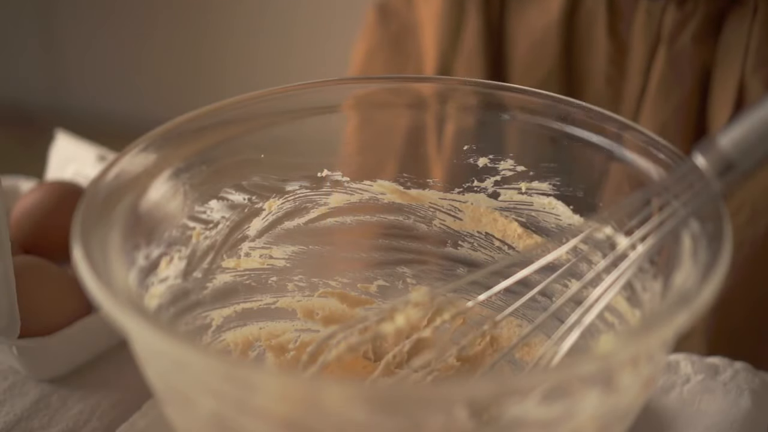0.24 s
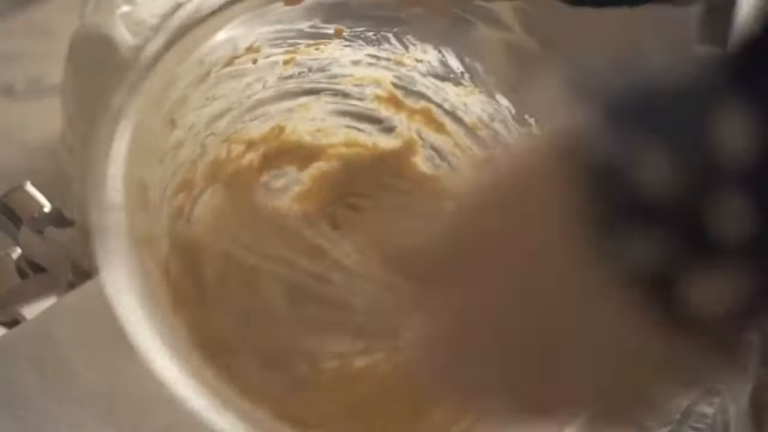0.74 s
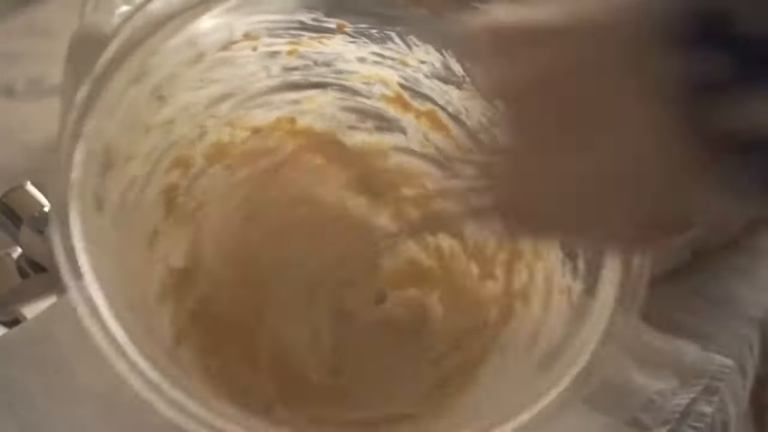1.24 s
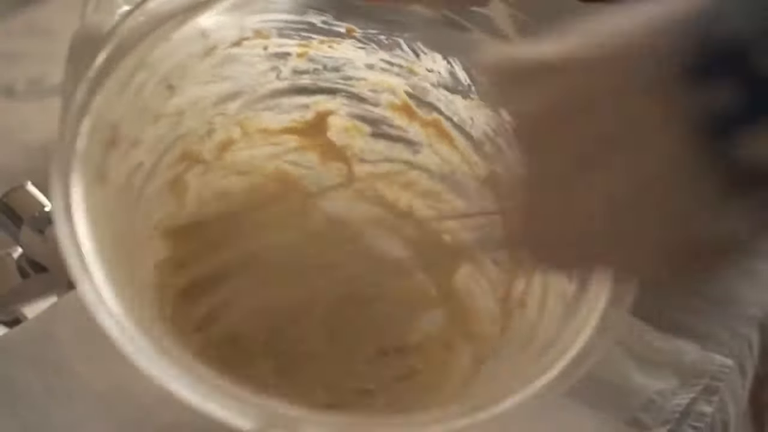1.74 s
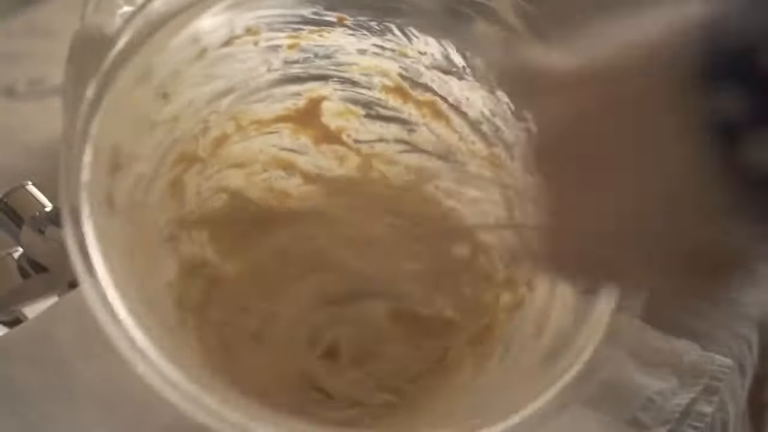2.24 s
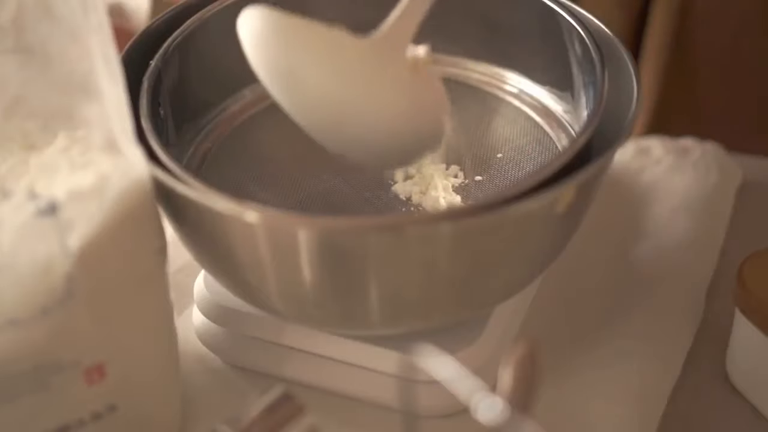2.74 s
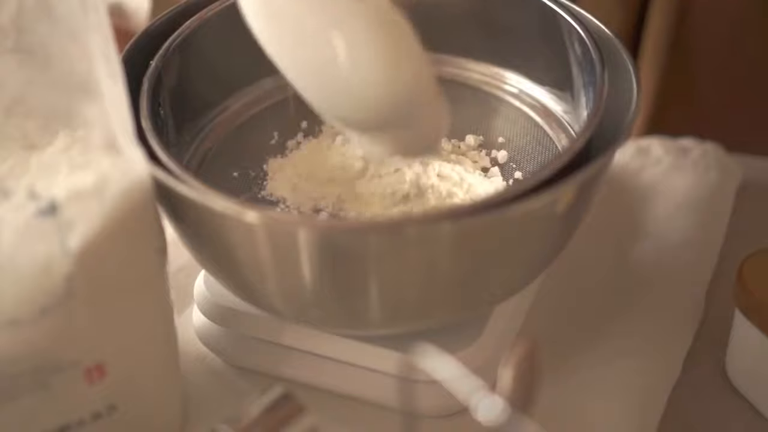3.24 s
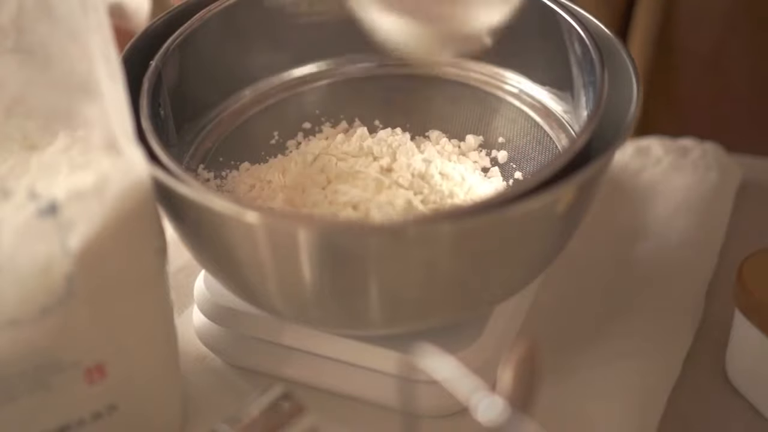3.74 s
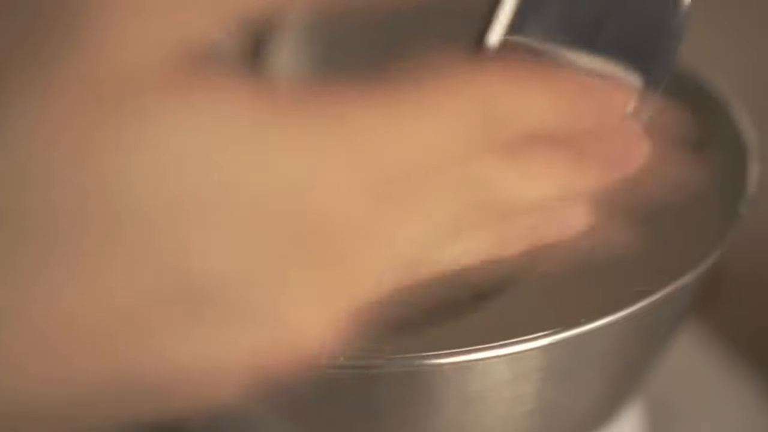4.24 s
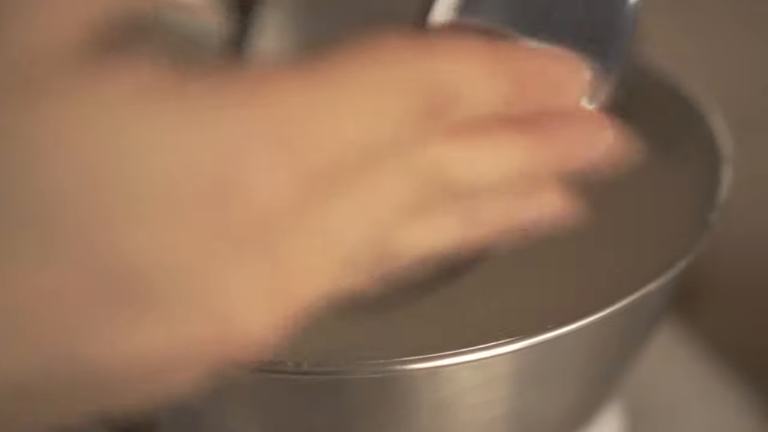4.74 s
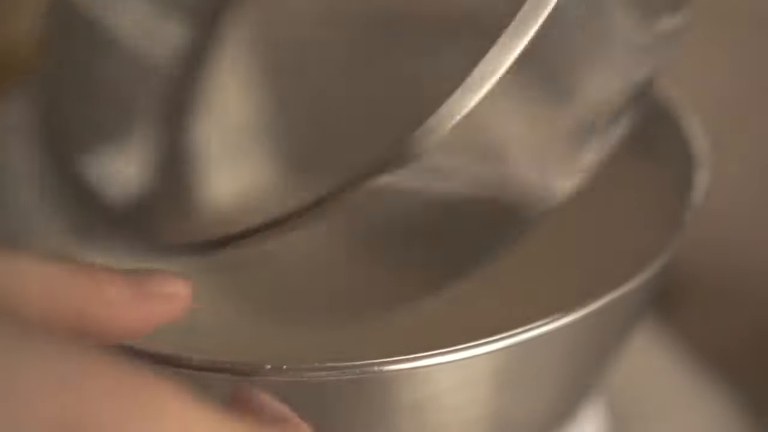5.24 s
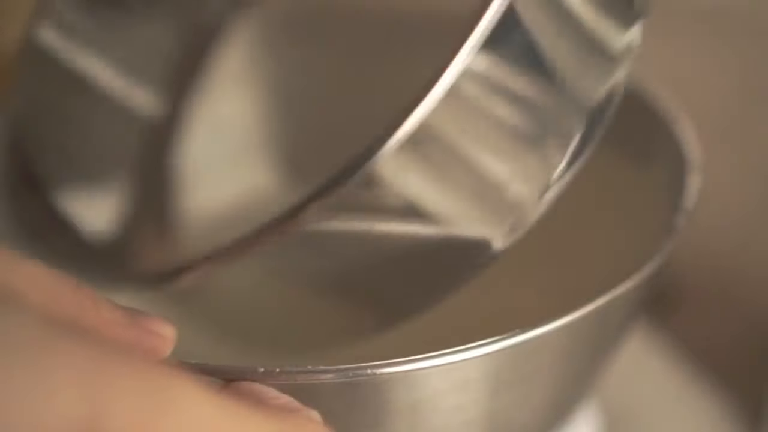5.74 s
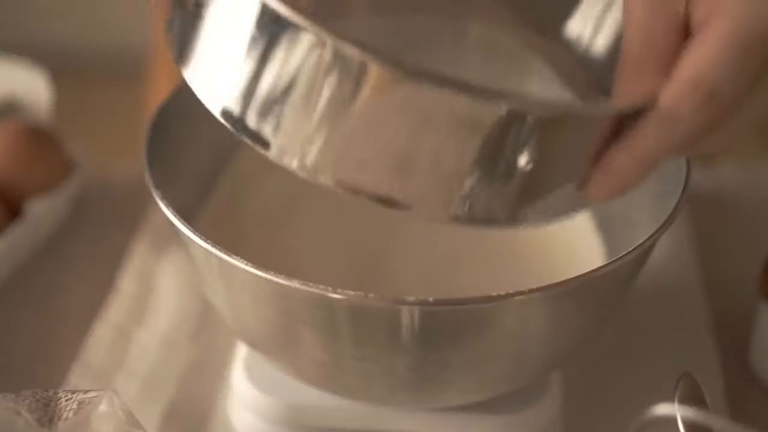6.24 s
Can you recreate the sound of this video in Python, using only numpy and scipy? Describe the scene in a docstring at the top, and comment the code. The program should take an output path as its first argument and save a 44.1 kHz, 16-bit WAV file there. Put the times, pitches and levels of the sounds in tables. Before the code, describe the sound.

In a small quiet kitchen, closely miked, a wire whisk clatters against a glass bowl about ten times a second, with sticky butter squelches and popping air pockets. It stops; flour lumps tick faintly onto mesh. A palm pats the sieve five times with dull thumps, soft shakes follow, and finally the rim clanks sharply against a steel bowl in quick knocks.

```python
"""A wire whisk beats soft butter in a glass bowl: noise grains coloured by glass and butter, with ringing
wire modes, torn hollows and bursting air pockets. Then flour is spooned into a steel sieve as ticking grains.
A palm pats the sieve five times (sine thump, noise slap), setting its mesh wobbling; soft shakes hiss flour.
Last, the rim is knocked four times against a steel bowl: noise cracks and ringing modes, with short slides.
All this in a small quiet kitchen: short noise reflections, steady air noise and a low hum."""
import sys
import numpy as np
from scipy import signal
from scipy.fft import rfft, irfft
from scipy.io import wavfile
from scipy.ndimage import uniform_filter1d

SR = 44100
rng = np.random.default_rng(int(sys.argv[2]) if len(sys.argv) > 2 else 0)


def store_pcm(level_fs):
    """Save levels as 16-bit WAV."""
    pcm = np.round(np.clip(level_fs, -1, 1) * 32767).astype(np.int16)
    wavfile.write(sys.argv[1], SR, np.atleast_2d(pcm).T)


N = 285768
T = np.arange(N) / SR
AGE = T[:SR // 2]   # time since an event, s

# Steady room air. Each row: frequency in Hz, relative density in dB per Hz.
ROOM_COLOUR = [(12, -36), (20, -2), (75, -6.5), (97, -3), (124, 1.5), (157, -8.5), (199, -4), (295, -14),
               (365, -10.5), (416, -15.5), (652, -15.5), (806, -17.5), (2260, -22.5), (4480, -26),
               (11000, -29), (14300, -104)]
# Hum tones. Each row: frequency in Hz, level in dB rms.
HUM_TONES = [(76, -64), (124, -66), (366, -75.5)]
ROOM_AIR_DB = -55
# Stereo width of near sounds. Each row: frequency in Hz, side level in dB re mid.
NEAR_SIDE = [(100, -14), (700, -26), (2000, -19), (4500, -9.5), (11000, -8)]
# Stereo width of diffuse air. Each row: frequency in Hz, side level in dB re mid.
AIR_SIDE = [(100, -12), (200, -6.5), (1100, -3), (4000, -1), (11000, 0)]
KITCHEN_T60_S, KITCHEN_DB = 0.22, -11
CUTOFF_HZ = 11050

# Whisk meets glass. Each row: start in seconds, level in dB, bass shelf in dB, treble shelf in dB,
# contact time in seconds, pitch of the hollow in the butter in Hz, squelch after it in dB before the mix gains.
WHISK_HITS = [(.308, -28, 0, 4, 0.012, 1760, -32), (.367, -28.5, -6, -5, 0.0081, 2110, -33.5),
              (0.413, -33, -2, 6, 0.0039, 3430, -45), (.519, -37.5, 11, 8, 0.012, 2410, -33.5),
              (.586, -25, 5, -1, 0.016, 2260, -38), (.688, -25.5, 2, -0.5, 0.015, 1910, -34),
              (.792, -35.5, 4, -5, 0.014, 3990, -56), (.807, -25.5, -0.5, -5.5, 0.0033, 2400, -58),
              (.914, -31, 2, 1, 0.017, 3000, -41), (1.008, -29, 1, -9, 0.006, 1500, -37.5),
              (1.125, -35, -3, -2, 0.0053, 1450, -55), (1.138, -32.5, 2.5, 2, 0.0062, 1450, -36.5),
              (1.243, -26.5, -4, -5, 0.0036, 1460, -37.5), (1.353, -39.5, 7, 5.5, 0.034, 1760, -43),
              (1.471, -23, 4, -4, 0.0068, 2520, -34), (1.577, -31, -0.5, 9, 0.0082, 1690, -62),
              (1.611, -32, 6.5, 6, 0.0038, 3360, -52), (1.715, -26, 6, 0.5, 0.0081, 1480, -42),
              (1.838, -29.5, -2.5, 2.5, 0.017, 1220, -42.5), (1.972, -33, -2, -6, 0.024, 1850, -41),
              (2.0745, -31, 2.5, 5.5, 0.006, 2930, -38), (2.196, -25.5, 0.5, -7, 0.0049, 1570, -34.5),
              (2.308, -36, 5.5, 4, 0.0029, 1460, -57), (2.324, -28.5, -1, 7, 0.0066, 1820, -43.5),
              (2.423, -40, 0, -0.5, 0.0074, 3160, -64)]
# Wires spring clear of the butter and twang. Each row: start in seconds, level in dB,
# boost above 4.5 kHz in dB, share of the free ring time.
TWANGS = [(.308, -36, 16, 0.32), (1.245, -47.5, 18, 0.25), (1.579, -44, 12, 1), (1.611, -42, 8, 0.53),
          (1.853, -39, 9.5, 0.64), (1.975, -48, -7, 0.66), (2.087, -39, 2, 0.68), (2.324, -34, 0, 0.45)]
# Wire loops. Each row: frequency in Hz, relative level in dB, free t60 in seconds.
WIRE_MODES = [(660, -7.5, 0.24), (1777, 4.5, 0.37), (3284, -4, 0.2), (3360, -6, 0.09), (5160, -7, 0.08),
              (7315, -7, 0.15), (7450, -11, 0.12)]
# Colour of the struck glass. Each row: frequency in Hz, relative density in dB per Hz.
GLASS_COLOUR = [(150, -18.5), (270, -16.5), (510, 1.5), (720, -3.5), (1200, -9), (1420, -1), (1630, -5),
                (1900, -5), (4830, -9), (5750, -12.5), (6840, -15), (7400, -8.5), (8010, -14), (10500, -13),
                (13000, -49)]
# Glass bowl damped by the butter. Each row: frequency in Hz, width in Hz, boost in dB.
BOWL_PEAKS = [(550, 84, -3.5), (652, 87, 6), (1040, 280, -2)]
TRAILING_GAP_S, TRAILING_LOSS_DB = 0.014, 7   # gap before random scaling; loss per further wire

# Uneven drag through the butter. Each row: time in seconds, level in dB before DRAG_DB and the mix gains.
DRAG_COURSE = [(0.4, -51), (0.475, -27.5), (0.564, -42), (0.852, -43), (1.442, -33.5), (1.756, -41),
               (2.174, -36.5), (2.274, -48), (2.38, -70)]
# Colour of butter sounds. Each row: frequency in Hz, relative density in dB per Hz.
BUTTER_COLOUR = [(120, -38), (230, -18), (404, -0.5), (692, 0.5), (1150, -10), (1420, -1.5), (2500, -4),
                 (3830, -6.5), (5530, -12.5), (7360, -9), (9000, -13), (10300, -12), (13000, -42)]
SQUELCH_RISE_S, SQUELCH_FALL_DB_PER_S = 0.032, 186
WHISK_START_S, WHISK_END_S = .31, 2.44
TEARING_DB, TICKS_DB, DRAG_DB = -5, -13.5, -6
HOLLOW_LOW_HZ, HOLLOW_HIGH_HZ, HOLLOW_Q = 554, 5350, 7.7

# Table shudders under the bowl. Each row: time in seconds, level in dB before SHUDDER_GAIN_DB.
SHUDDER_COURSE = [(0.31, -53), (0.37, -37), (0.46, -46.5), (0.65, -55), (0.77, -43), (0.91, -52.5),
                  (0.96, -49), (1.08, -54), (1.59, -49.5), (1.63, -47), (2.05, -50), (2.27, -48),
                  (2.43, -65)]
# Colour of the table. Each row: frequency in Hz, relative density in dB per Hz.
TABLE_COLOUR = [(20, -22), (40, -7.5), (54, 2.5), (75, -11), (115, -5.5), (170, -20.5), (300, -23.5),
                (600, -54)]
SHUDDER_GAIN_DB = -2.5

# Placed air-pocket bursts. Each row: start in seconds, level in dB before POCKET_GAIN_DB, pitch in Hz.
AIR_POCKETS = [(0.8336, -24, 2230), (1.5312, -19, 3270), (1.5492, -26, 2210), (1.5635, -26, 1770),
               (1.7868, -38, 1600), (1.811, -36, 1940), (1.0855, -29.5, 2500)]
POCKET_GAIN_DB, SMALL_POCKET_MIN_DB = 2, -40   # the minimum is before the gain
POCKET_CYCLES = 13.4   # cycles to fall 60 dB

# Single wires scrape the butter. Each row: start in seconds, level in dB, ringing pitch in Hz.
SCRAPES = [(.387, -32.5, 2100), (0.399, -41, 7400), (.452, -35, 2240), (.476, -37, 9000),
           (0.716, -48, 2500), (.739, -36, 2500), (0.894, -40.5, 1710), (1.021, -30.5, 1670),
           (1.052, -42, 3450), (1.157, -40.5, 686), (1.186, -35, 695), (1.28, -36, 3360),
           (1.308, -31.5, 3310), (1.336, -36.5, 2210), (1.392, -39, 3350), (1.435, -38.5, 3040),
           (1.745, -30, 2560), (1.954, -36.5, 2160), (2.009, -39, 1810), (2.14, -39, 694),
           (2.226, -39, 3750)]
SCRAPE_S, SCRAPE_PEAK_DB, SCRAPE_WIDTH_SHARE = 0.0025, 11, 0.67

# Lumps of flour drop from the spoon on the mesh. Each row: start in seconds, level in dB.
FLOUR_LUMPS = [(2.604, -52.5), (2.624, -53.5), (2.729, -54.5), (2.872, -55), (2.897, -60), (2.965, -55),
               (3.266, -58.5), (3.317, -54), (3.347, -55), (3.372, -57), (3.389, -59.5)]
# Colour of flour on mesh. Each row: frequency in Hz, relative density in dB per Hz.
FLOUR_COLOUR = [(600, -19), (1300, -8), (1650, -10), (2100, -2), (2330, -6), (2550, 3), (2900, -9),
                (3600, -6), (4400, -18), (11000, -25)]
BRUSH_S = 0.0039

# Resonances of the creak. Each row: frequency in Hz, relative level in dB, t60 in seconds.
CREAK_MODES = [(468, -6.5, 0.23), (920, -5, 0.14), (1102, -8, 0.2), (1430, 1, 0.046), (1690, 4, 0.03)]
CREAK_PEAK_S, CREAK_DB, CREAK_RISE_S, CREAK_FALL_DB_PER_S = 3.8, -59, 0.05, 60

# Palm pats the sieve. Each row: start in seconds, thump in dB, lag of the slap in seconds, slap in dB,
# treble shelf in dB, wobble after it in dB.
PATS = [(4.076, -23, -0.00088, -30, -2.5, -37.5), (4.2215, -34, -0.0042, -31, 3, -48),
        (4.3649, -29, 0.0026, -35, 4.5, -45), (4.522, -26.5, -.0004, -31, -3.5, -48.5),
        (4.6618, -27, 0.00062, -33.5, -5.5, -47)]
# Colour of the palm slap. Each row: frequency in Hz, relative density in dB per Hz.
PALM_COLOUR = [(70, -10), (370, -16), (600, -8), (1080, -21.5), (1380, -7.5), (1580, -6.5), (1850, -17.5),
               (2100, -10.5), (2500, -16), (3100, -9.5), (4300, -17), (11000, -16)]
THUMP_HZ, THUMP_RISE_S, SLAP_S = 328, 0.0014, 0.0042

# Flutter of the mesh. Each row: frequency in Hz, relative density in dB per Hz.
WOBBLE_COLOUR = [(35, -29), (60, -1), (75, 8.5), (92, -4), (130, 7.5), (180, -17), (280, -13.5), (450, -22),
                 (1000, -45)]
REBOUND_S, WOBBLE_RISE_S, WOBBLE_FALL_DB_PER_S = 0.07, 0.028, 102
MESH_HZ, MESH_SWAY_SHARE, MESH_DB, FLUTTER_DB = 108, 0.15, -4, -3   # centre pitch, its unsteadiness

# Soft shakes. Each row: start in seconds, wobble in dB, hiss of flour through the mesh in dB.
SHAKES = [(4.84, -46, -64.5), (4.99, -52, -63.5), (5.145, -43.5, -73), (5.33, -46, -63.5),
          (5.47, -52.5, -73), (5.63, -68, -66.5), (5.77, -57.5, -68)]
SIFT_LAG_S, SIFT_S = 0.025, 0.14

# Sieve rim knocks on the bowl. Each row: start in seconds, crack in dB, bass shelf in dB, treble shelf in dB,
# contact time in seconds, ring of the hoop in dB, ring of the bowl in dB, pitch of the struck spot in Hz.
CLANKS = [(6.0074, -36.5, -3, -3, 0.013, -39.5, -45.5, 3830),
          (6.106, -24.5, 16, 5.5, 0.007, -59, -47, 2150), (6.11, -18.5, 0, 6, 0.0011, -51, -35.5, 3620),
          (6.241, -26, 4.5, 1, 0.0057, -44, -48, 8200), (6.2529, -18, -17, -2, 0.0039, -35, -43, 3600),
          (6.3806, -24.5, 10.5, -1, 0.0047, -44, -48, 4600), (6.389, -25, -4, -10, 0.0035, -50, -49, 5600),
          (6.405, -20.5, -21, -1, 0.0037, -37.5, -41, 5880)]
# Colour of the crack. Each row: frequency in Hz, relative density in dB per Hz.
STEEL_COLOUR = [(120, -54), (200, -21), (605, -16.5), (1150, -13.5), (1450, -20), (1750, -6.5), (3020, -13),
                (3580, -1.5), (4200, -8), (5440, -6.5), (6330, -7.5), (6900, -2), (7330, -13), (7900, -7),
                (11000, -7), (14300, -40)]
# Modes of the sieve hoop. Each row: frequency in Hz, relative level in dB.
HOOP_MODES = [(1660, 3), (1718, -8), (3370, -3), (3700, -3), (3967, -6), (4855, -4), (5375, -3), (6045, -5)]
# Modes of the steel bowl. Each row: frequency in Hz, relative level in dB.
BOWL_MODES = [(1890, -1), (1992, -1), (2147, -3), (2263, -1), (2573, -6), (2873, -8), (3219, -6),
              (3469, -2), (3592, 1), (4530, -4), (5453, -5), (5976, -4), (6665, -3), (6842, -5), (7639, -7),
              (8290, -7)]
# Wash of weaker modes. Each row: frequency in Hz, relative density in dB per Hz.
WASH_COLOUR = [(200, -9.5), (1300, -20), (1650, 0), (2200, 0), (3000, -4.5), (3600, 0), (5000, -4),
               (6100, -4), (7350, -16), (7900, -9.5), (11000, -13.5)]
# Rim slides on the bowl. Each row: peak in seconds, level in dB before the mix gains, length in seconds.
SLIDES = [(6.336, -44.5, 0.014), (6.373, -49, 0.0064), (6.457, -49, 0.018)]
STEEL_T60_AT_2KHZ_S, WASH_SPACING_HZ = 0.125, 40
CHATTER_RAD, CHATTER_PER_S = .4, 80


def amp(db):
    """Decibels to gain."""
    return 10 ** (np.asarray(db) / 20)


def rms_one(x):
    """Scale to unit rms."""
    return x / np.sqrt(np.mean(x ** 2) + 1e-20)


def decay(t60_s):
    """Envelope that loses 60 dB in t60_s (at least 1 ms)."""
    return np.exp(-np.log(1000) * AGE / max(t60_s, 1e-3))


def level(rows):
    """Gain in time from (s, dB) rows, silent outside them."""
    s, db = np.transpose(rows)
    return amp(np.interp(T, s, db, left=-200, right=-200))


def at_hz(points, hz):
    """Read a spectrum on a log-frequency axis."""
    f, db = np.transpose(points)
    return np.interp(np.log(hz + 1), np.log(f), db)


def add(out, s, sound, pan_db=0):
    """Mix a sound in at time s; positive pan favours the first channel."""
    i = int(s * SR)
    panned = sound * amp([[pan_db / 2], [-pan_db / 2]])
    out[:, i:i + sound.shape[-1]] += panned[:, :N - i]


def coloured(raw, spectrum, peaks=(), low_db=0, high_db=0, width=NEAR_SIDE):
    """Two unrelated signals become a stereo pair with a spectrum, resonances and two shelves; rms 1."""
    hz = np.fft.rfftfreq(raw.shape[1], 1 / SR)
    shelves = [(900, low_db), (1400, 0), (3000, 0), (7000, high_db)]
    db = at_hz(spectrum, hz) + at_hz(shelves, hz)
    for centre_hz, width_hz, peak_db in peaks:
        db = db + peak_db / (1 + (2 * (hz - centre_hz) / width_hz) ** 2)
    mid, side = rfft(raw) * amp(db)
    side = side * amp(at_hz(width, hz))
    return rms_one(irfft([mid + side, mid - side], raw.shape[1]))


def noise(size=N):
    """Two unrelated white noises."""
    return rng.standard_normal((2, size))


def wander(t, per_s):
    """A random value that glides to a new place per_s times a second."""
    return np.interp(t * per_s, np.arange(2000), rng.standard_normal(2000))


def grains(per_s, spread_db, size=N):
    """Random tiny contacts of uneven size."""
    sizes = amp(spread_db * np.minimum(rng.exponential(1, size), 4))
    return noise(size) * sizes * (rng.random(size) < per_s / SR)


def ring(modes, scatter_db=2, upper_db=0, upper_hz=4500, free=1, detune=0.0017, chatter=0):
    """Decaying modes, weighted and detuned anew at each call; chatter (rad) makes their phases waver."""
    hz, db, t60_s = np.transpose(modes)
    gain = amp(db + scatter_db * 2 * rng.random(len(hz)) + upper_db * (hz > upper_hz))
    hz = hz * (1 + detune * rng.standard_normal(len(hz)))
    phase = rng.uniform(0, 2 * np.pi, (len(hz), 1, 1)) + rng.normal(0, 0.37, (len(hz), 2, 1))
    out = np.zeros((2, len(AGE)))
    for f, g, t, p in zip(hz, gain, t60_s, phase):
        waver = chatter * wander(AGE, CHATTER_PER_S)
        out += g * decay(t * free) * np.sin(2 * np.pi * f * AGE + p + waver)
    return out


def contact(length_s, t60_s):
    """The touch builds within a millisecond, holds for 0.72 of its length, then dies away."""
    held = np.exp(-np.log(1000) * np.maximum(AGE - 0.72 * length_s, 0) / max(t60_s, 1e-3))
    return held * (1 - decay(0.0018))


def clumps(per_s, depth_db):
    """A gain that lurches at random; rms 1."""
    return rms_one(amp(depth_db * wander(T, per_s)))


def swell(s, length_s):
    """A smooth rise and fall around time s."""
    return np.exp(-((T - s) / length_s) ** 2)


def surge(s, rise_s, fall_db_per_s):
    """Swells to its top at time s, then dies away evenly in dB."""
    fall = amp(-abs(fall_db_per_s) * np.clip(T - s, 0, 2))
    return np.where(T < s, swell(s, rise_s), fall)


def room():
    """Steady, wide air noise with a low hum."""
    hum = sum(np.sqrt(2) * amp(db) * np.sin(2 * np.pi * (hz * T + rng.random())) for hz, db in HUM_TONES)
    return amp(ROOM_AIR_DB) * coloured(noise(), ROOM_COLOUR, width=AIR_SIDE) + hum


def whisk():
    """Wires patter on the glass in quick clusters; the butter chokes the bowl within milliseconds."""
    out = np.zeros((2, N))
    for s, db, knock_db, bright_db, length_s, hollow_hz, _ in WHISK_HITS:
        patter = grains(per_s=7000, spread_db=-1.0, size=len(AGE))
        pocket = [(hollow_hz, 450, 6)]   # air trapped in the butter colours each stroke
        hit = coloured(patter, GLASS_COLOUR, list(BOWL_PEAKS) + pocket, knock_db, bright_db)
        touch = contact(length_s, t60_s=0.045) + amp(-26.5) * decay(0.088)
        for k in (1, 2):   # further wires trail the first, each weaker
            lag_s = k * TRAILING_GAP_S * rng.uniform(0.69, 1.33)
            trailing = np.interp(AGE - lag_s, AGE, contact(0.0016, t60_s=0.0061), left=0)
            touch = np.hypot(touch, amp(-k * TRAILING_LOSS_DB) * trailing)
        add(out, s, amp(db) * hit * touch, pan_db=-0.4)
    return out


def twangs():
    """Wire loops freed from the butter ring in their modes, for part of their free ring time."""
    out = np.zeros((2, N))
    for s, db, upper_db, free in TWANGS:
        twang = ring(WIRE_MODES, upper_db=upper_db, free=free, scatter_db=3.0, detune=0.00057)
        add(out, s, amp(db) * twang)
    return out


def crackle():
    """Hollows of many sizes open in the butter, each in short spurts of its own, and ring for a few cycles."""
    out = np.zeros((2, N))
    for hz in np.geomspace(HOLLOW_LOW_HZ, HOLLOW_HIGH_HZ, 14):
        spurts = grains(per_s=900, spread_db=3.0) * clumps(per_s=90, depth_db=7)
        b, a = signal.iirpeak(hz, HOLLOW_Q, fs=SR)
        out += signal.lfilter(b, a, spurts + 1e-18)
    return coloured(out, BUTTER_COLOUR, BOWL_PEAKS, low_db=-0.5, high_db=3.5)


def butter():
    """Tearing in clumps and wire ticks surge behind each stroke, over a drag that swells and fades."""
    ticks = coloured(grains(per_s=2600, spread_db=3.5), BUTTER_COLOUR, low_db=-10, high_db=8.5)
    ticks = ticks * clumps(per_s=76, depth_db=4.0)
    whisking = uniform_filter1d(1. * (T > WHISK_START_S) * (T < WHISK_END_S), size=400)
    stroke_power = np.zeros(N)
    for s, *_, db in WHISK_HITS:
        stroke = amp(db) * surge(s + SQUELCH_RISE_S, SQUELCH_RISE_S, SQUELCH_FALL_DB_PER_S)
        stroke_power += stroke ** 2
    drag = amp(DRAG_DB) * level(DRAG_COURSE)
    effort = whisking * np.sqrt(stroke_power + drag ** 2)
    return effort * (amp(TEARING_DB) * crackle() + amp(TICKS_DB) * ticks)


def table():
    """The table shudders under the bowl: low noise with a drawn level."""
    return amp(SHUDDER_GAIN_DB) * level(SHUDDER_COURSE) * coloured(noise(), TABLE_COLOUR)


def pockets():
    """Air pockets in the butter burst, placed or at random, and ring for a dozen cycles or so."""
    out = np.zeros((2, N))
    small = []
    for when, pitch, size in rng.random((25, 3)):
        s = WHISK_START_S + when * (WHISK_END_S - WHISK_START_S)
        small.append((s, SMALL_POCKET_MIN_DB + 12 * size, 1700 * 2 ** pitch))
    for s, db, hz in list(AIR_POCKETS) + small:
        add(out, s, amp(db) * np.sin(2 * np.pi * hz * AGE) * decay(POCKET_CYCLES / hz))
    return amp(POCKET_GAIN_DB) * out


def scrapes():
    """A single wire sticks and slips for a few milliseconds, each time with a colour of its own."""
    out = np.zeros((2, N))
    for s, db, hz in SCRAPES:
        slips = grains(per_s=3400, spread_db=4.0, size=len(AGE))
        peak = [(hz, SCRAPE_WIDTH_SHARE * hz, SCRAPE_PEAK_DB)]
        scrape = coloured(slips, BUTTER_COLOUR, peak, high_db=3.0)
        add(out, s, amp(db) * scrape * contact(SCRAPE_S, t60_s=0.07))
    return out


def spoon():
    """Lumps of flour drop on the mesh and scatter in fine ticks."""
    out = np.zeros((2, N))
    for s, db in FLOUR_LUMPS:
        crumbs = coloured(grains(per_s=3600, spread_db=3.0, size=len(AGE)), FLOUR_COLOUR)
        add(out, s, amp(db) * crumbs * contact(BRUSH_S, t60_s=0.075))
    return out


def creak():
    """Noise excites a few resonances: a faint creak swells and fades."""
    tone = rms_one(signal.fftconvolve(noise()[:1], ring(CREAK_MODES), axes=1)[:, :N])
    return amp(CREAK_DB) * surge(CREAK_PEAK_S, CREAK_RISE_S, CREAK_FALL_DB_PER_S) * tone


def pats():
    """The palm thumps and slaps the sieve and damps it at once."""
    out = np.zeros((2, N))
    # the soft palm loads the sieve gradually: a brief rounded swing
    load = AGE / THUMP_RISE_S * np.exp(1 - AGE / THUMP_RISE_S)
    thump = np.sin(2 * np.pi * THUMP_HZ * AGE) * load ** 2
    touch = contact(SLAP_S, t60_s=0.016) + amp(-23) * decay(0.06)
    for s, thump_db, lag_s, slap_db, bright_db, _ in PATS:
        cup = [(rng.uniform(1250, 3550), 900, 5)]   # the cup of the hand differs each time
        slap = coloured(noise(len(AGE)), PALM_COLOUR, cup, high_db=bright_db)
        add(out, s, amp(thump_db) * thump)
        add(out, s + lag_s, amp(slap_db) * slap * touch, pan_db=-1)
    return out


def mesh():
    """Pats and shakes set the flour-laden mesh swinging at a low, unsteady pitch, with some flutter."""
    pushes = [(s + REBOUND_S, db) for s, *_, db in PATS] + [(s, db) for s, db, _ in SHAKES]
    wobble = sum(amp(db) * surge(s, WOBBLE_RISE_S, WOBBLE_FALL_DB_PER_S) for s, db in pushes)
    hz = MESH_HZ * (1 + MESH_SWAY_SHARE * wander(T, per_s=62))
    swing = np.sqrt(2) * np.sin(2 * np.pi * np.cumsum(hz) / SR)
    return wobble * (amp(MESH_DB) * swing + amp(FLUTTER_DB) * coloured(noise(), WOBBLE_COLOUR))


def sifting():
    """Flour falls through the mesh at each shake: wide noise that swells and fades."""
    flow = sum(amp(db) * swell(s + SIFT_LAG_S, SIFT_S) for s, _, db in SHAKES)
    colour = [(400, 5.5), (1500, 0.5), (4000, -1.0), (11000, -9.5)]   # Hz, dB per Hz
    return flow * coloured(noise(), colour, width=AIR_SIDE)


def steel(modes):
    """Give each mode its ring time, shorter the higher it is."""
    return [(hz, db, STEEL_T60_AT_2KHZ_S * (2000 / hz) ** .25) for hz, db in modes]


def weak_modes(hz):
    """Many steady partials, each with a fresh random strength and phase."""
    spectrum = rfft(noise(len(AGE)))
    bins = np.round(hz * len(AGE) / SR)
    return irfft(spectrum * np.isin(np.arange(spectrum.shape[1]), bins), len(AGE))


def clanks():
    """Steel on steel: a snap and a noisy crack, then hoop and bowl ring in their own modes, their phases
    chattering."""
    out = np.zeros((2, N))
    wash_hz = np.arange(WASH_SPACING_HZ, CUTOFF_HZ, WASH_SPACING_HZ)
    wash_hz = wash_hz + WASH_SPACING_HZ * rng.random(len(wash_hz))
    snap = amp(-0.5) * np.exp(-((AGE - .001) / 0.00032) ** 2)
    for s, db, knock_db, bright_db, length_s, hoop_db, bowl_db, spot_hz in CLANKS:
        crack = coloured(noise(len(AGE)), STEEL_COLOUR, [(spot_hz, 600, 8)], knock_db, bright_db)
        crack = crack * (contact(length_s, t60_s=0.019) + snap)
        wash = coloured(weak_modes(wash_hz), WASH_COLOUR) * (decay(0.066) + amp(-23.5) * decay(0.68))
        hoop = amp(hoop_db) * ring(steel(HOOP_MODES), chatter=CHATTER_RAD)
        bowl = amp(bowl_db) * ring(steel(BOWL_MODES), chatter=CHATTER_RAD)
        add(out, s, amp(db) * (crack + amp(-4.0) * wash) + hoop + bowl, pan_db=-0.1)
    return out


def slides():
    """The rim slides on the bowl: grains of rubbing excite the same steel modes."""
    rub = grains(per_s=8900, spread_db=-2.0)
    modes = steel(list(HOOP_MODES) + list(BOWL_MODES))
    singing = rms_one(signal.fftconvolve(rub[:1], ring(modes, chatter=CHATTER_RAD), axes=1)[:, :N])
    sliding = sum(amp(db) * swell(s, length_s) for s, db, length_s in SLIDES)
    return sliding * (amp(8) * coloured(rub, WASH_COLOUR) + amp(1.5) * singing)


def kitchen(x):
    """Short diffuse reflections as decaying noise, partly shared by the two channels."""
    mid, side = noise(len(AGE)) * decay(KITCHEN_T60_S) * (AGE > .006)
    tail = mid + amp(-4.0) * side * [[1], [-1]]
    tail /= np.sqrt(np.sum(tail ** 2) / 2)
    return x + amp(KITCHEN_DB) * signal.fftconvolve(x, tail, axes=1)[:, :N]


def scene():
    """All the work on the counter, in the room, a little left of centre."""
    whisking = whisk() + twangs() + butter() + table() + pockets() + scrapes()
    sieving = spoon() + creak() + pats() + mesh() + sifting() + clanks() + slides()
    return (kitchen(whisking + sieving) + room()) * amp([[.35], [-.35]])


def record(dry):
    """A steep low-pass cuts the top."""
    return signal.sosfilt(signal.ellip(10, .2, 70, CUTOFF_HZ, fs=SR, output="sos"), dry)


dry = scene()
out = record(dry)
store_pcm(out)
```